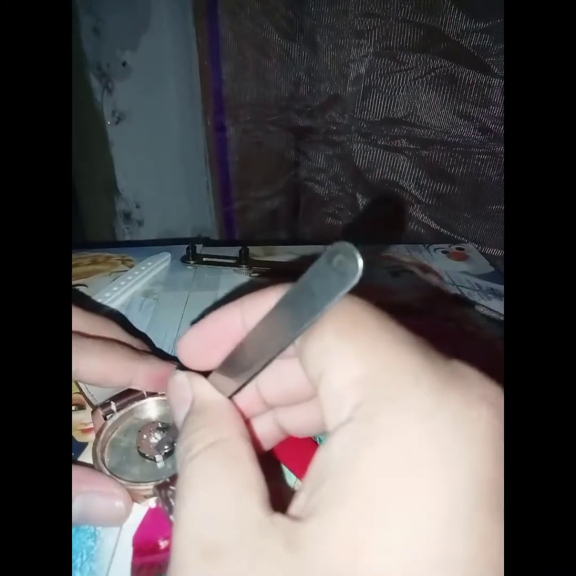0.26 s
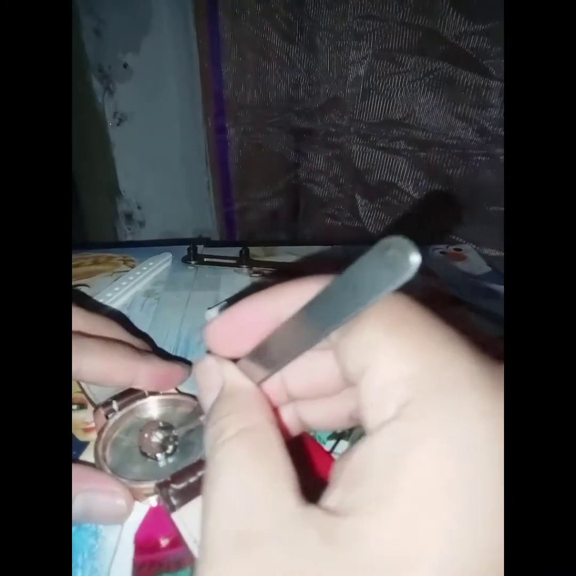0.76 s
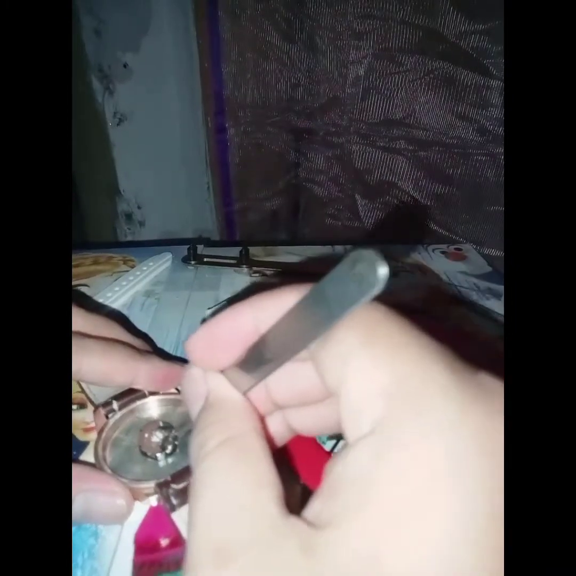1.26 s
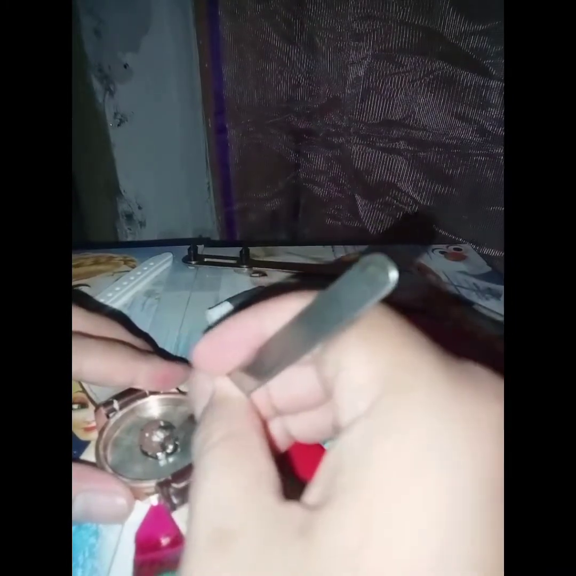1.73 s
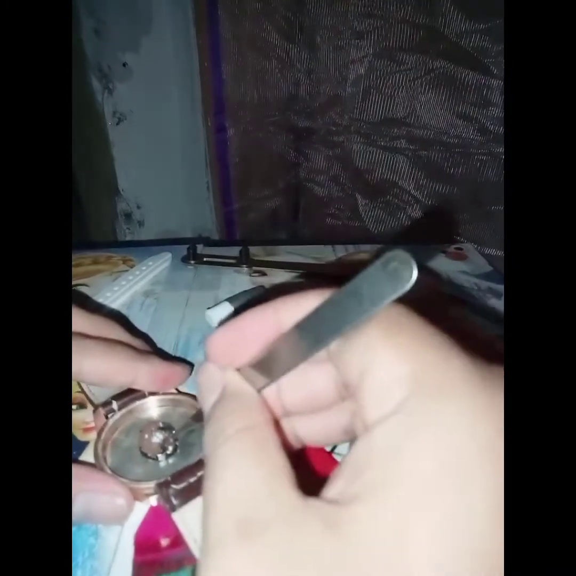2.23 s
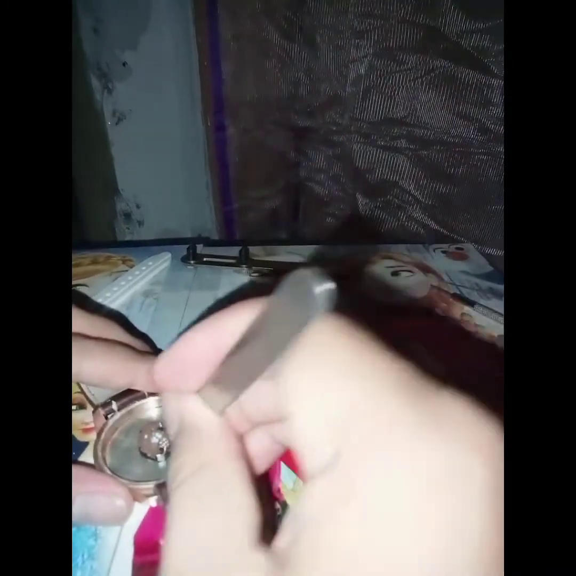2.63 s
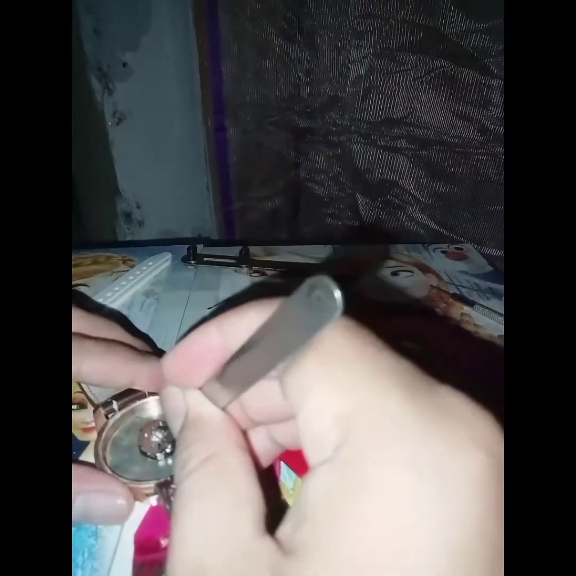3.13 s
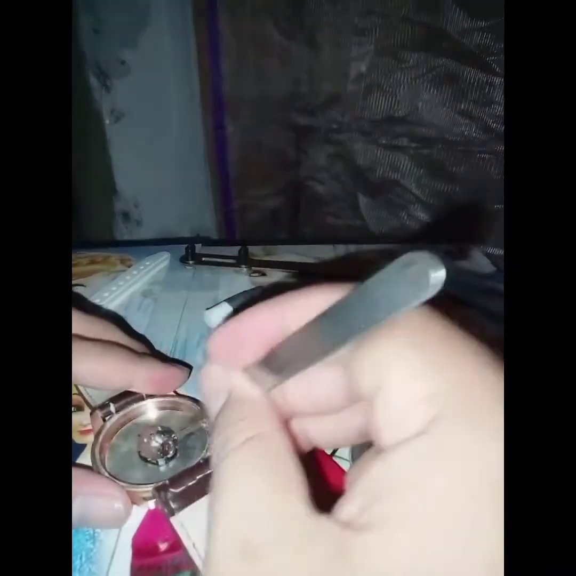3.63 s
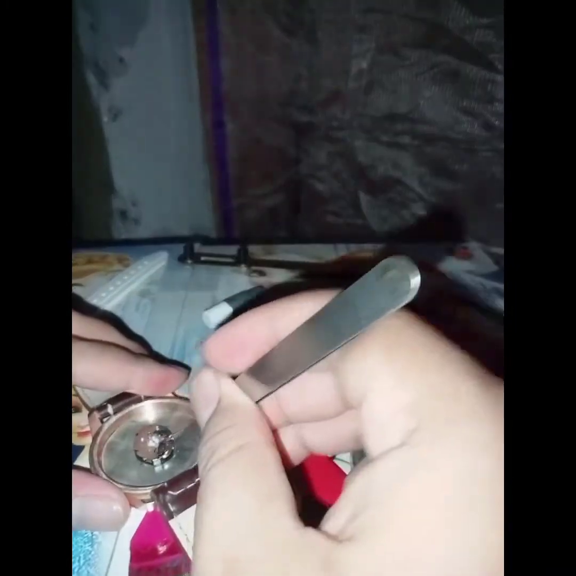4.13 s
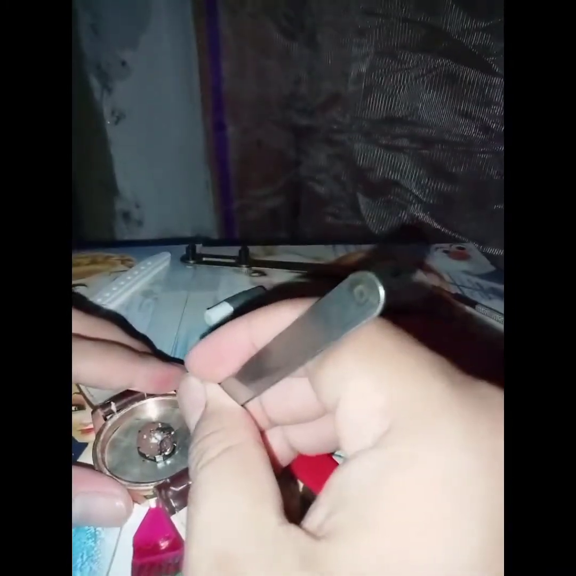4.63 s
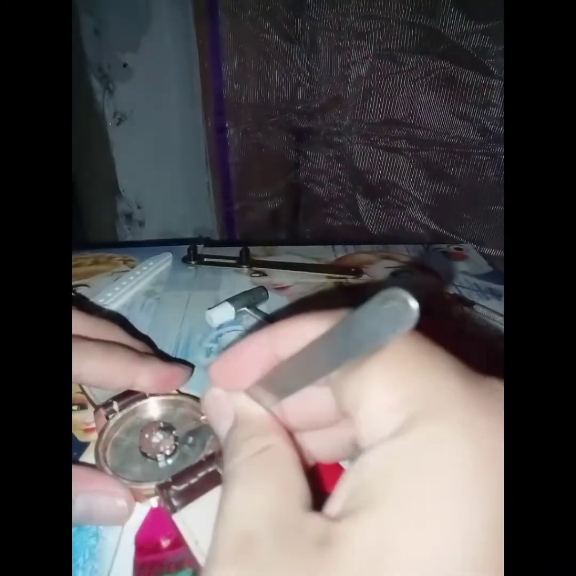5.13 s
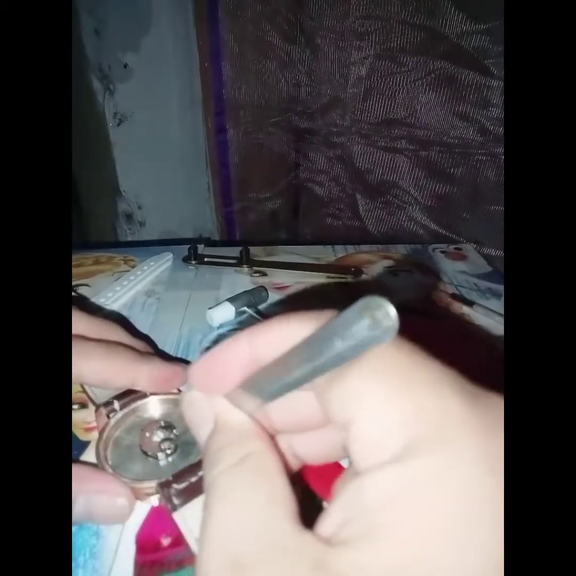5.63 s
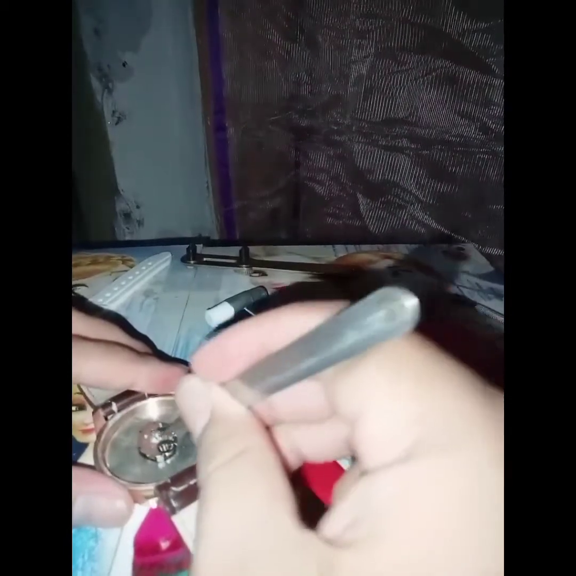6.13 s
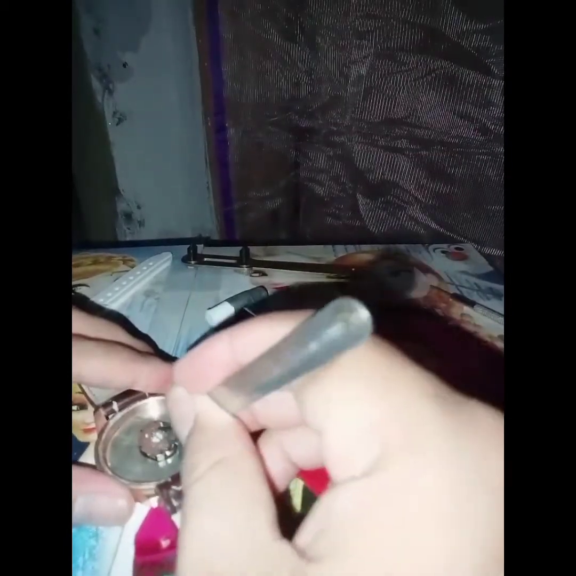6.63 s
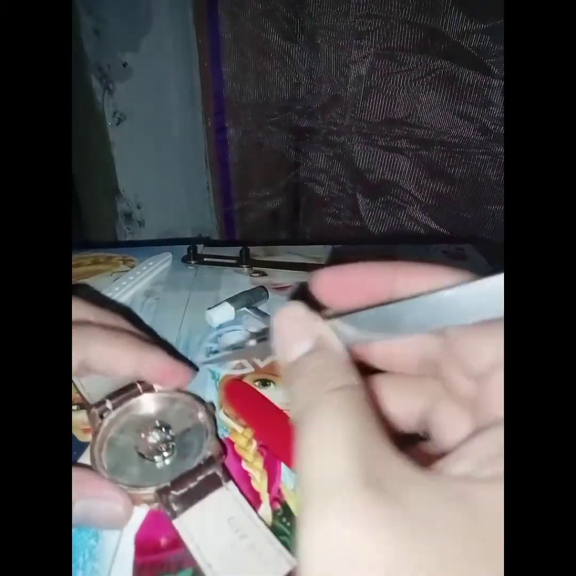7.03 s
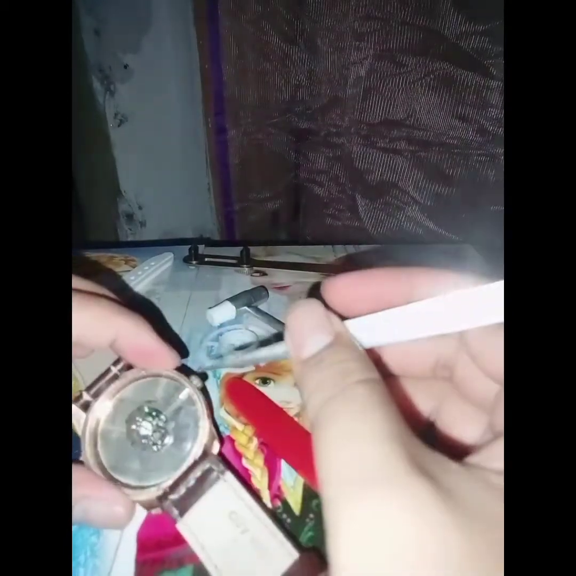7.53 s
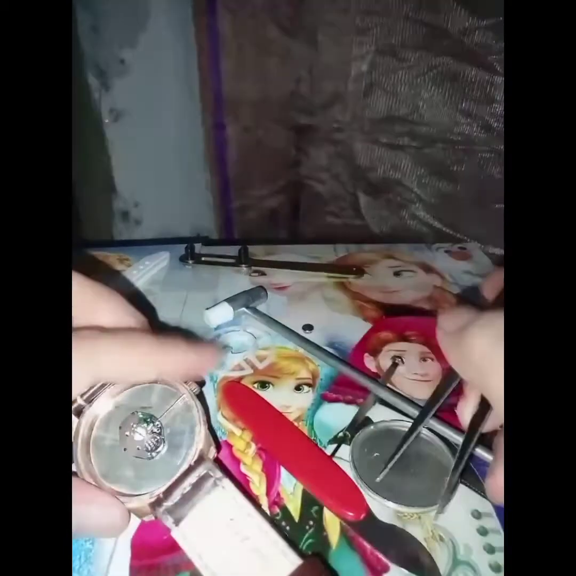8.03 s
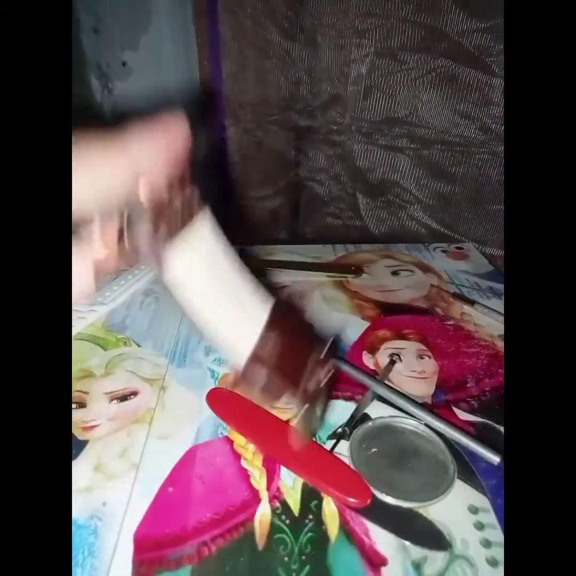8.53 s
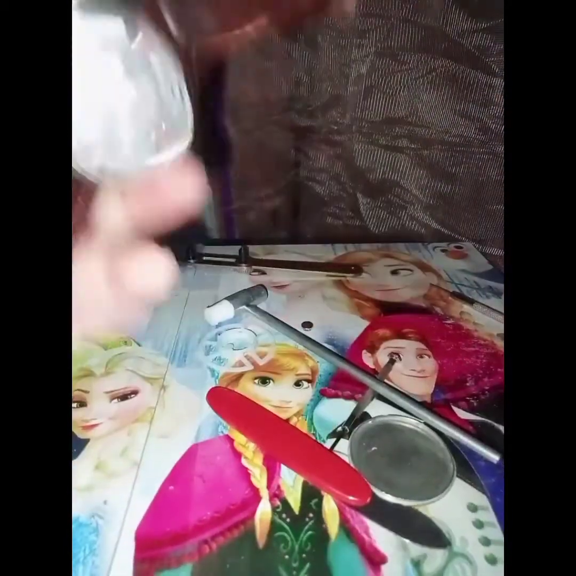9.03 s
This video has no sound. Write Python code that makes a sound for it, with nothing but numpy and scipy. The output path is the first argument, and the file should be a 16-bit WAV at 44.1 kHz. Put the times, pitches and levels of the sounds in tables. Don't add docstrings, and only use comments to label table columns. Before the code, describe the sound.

Small tweezers slip and snap on a metal battery rim, heard very near through a phone microphone. Tiny ticks, skidding clatters and brighter snaps alternate with near silence over a soft room hum. The strongest double crack comes about halfway. Towards the end handling turns softer, then the watch knocks and drags off the table with a clicking buckle, a low thud and a swish, leaving quiet room noise.

```python
import sys
import numpy as np
from scipy import signal
from scipy.fft import rfft, irfft
from scipy.io import wavfile

SR = 44100
rng = np.random.default_rng(int(sys.argv[2]) if len(sys.argv) > 2 else 0)


def rack_gain(trim_db):
    fader = np.asarray(trim_db, float)
    return 10 ** (fader / 20)


def generate_wav(sig):
    pcm = np.round(np.clip(np.atleast_2d(sig).T, -1, 1) * 32767).astype(np.int16)
    wavfile.write(sys.argv[1], SR, pcm)


N = 408347
CLOCK_S = np.arange(N) / SR


def rms_one(x):
    return x / np.sqrt(np.mean(x ** 2) + 1e-20)


def peak_one(x):
    return x / np.max(np.abs(x))


def coloured(spectrum, size):
    hz, db = np.transpose(spectrum)
    bins_hz = np.arange(1, size // 2 + 2) * SR / size
    gain = rack_gain(np.interp(np.log(bins_hz), np.log(hz), db))
    return rms_one(irfft(rfft(rng.standard_normal(size)) * gain, size))


def drift(rate_hz, size=N):
    r = np.exp(-2 * np.pi * rate_hz / SR)
    settle = SR // 4
    slow = signal.lfilter([1], [1, -2 * r, r * r], rng.standard_normal(size + settle))
    return rms_one(slow[settle:])


def resonate(x, modes, gains_db=None):
    if gains_db is None:
        gains_db = np.zeros(len(modes))
    out = 0
    for k, (hz, width, db) in enumerate(modes):
        r = np.exp(-np.pi * width / SR)
        top = (-1) ** k * rack_gain(db + gains_db[k]) * (1 - r * r) / 2
        out = out + signal.lfilter([top, 0, -top], [1, -2 * r * np.cos(2 * np.pi * hz / SR), r * r], x)
    return out


# f/Hz, level/dB (per Hz)
AIR_COLOUR = [(45, -30), (100, -8), (200, -5), (520, -15), (870, -5.5), (1200, -13), (1450, -11.5),
              (1900, -17), (4500, -22), (5700, -37.5), (7100, -27), (8000, -28), (8700, -40),
              (15500, -41.5)]
# f/Hz, bandwidth/Hz, level/dB
DRONE_MODES = [(98, 23, -4), (290.4, 37, 0), (7130, 200, -22.5)]
# t/s, level/dB
STILL_LEVEL = [(0.0, -57.5), (2.45, -55.5), (3.22, -56), (3.48, -53), (4.07, -52), (4.3, -54.5),
               (5.13, -56.5), (5.44, -60.5), (6.009, -59), (6.598, -59), (6.941, -58.5), (7.53, -59.5),
               (8.33, -56), (9.26, -52)]
LEAK_DB, LEAK_HZ, LEAK_TOP_DB = -6.5, 12, -44


def still_room(handling, patchy_db=1.5, drone_db=-0.5):
    drone = rms_one(resonate(rng.standard_normal(N), DRONE_MODES))
    air = coloured(AIR_COLOUR, size=N + N % 2)[:N] + rack_gain(drone_db) * drone
    r = np.exp(-2 * np.pi * LEAK_HZ / SR)
    leak_power = rack_gain(2 * LEAK_DB) * signal.lfilter([1 - r], [1, -r], handling ** 2)
    quiet = rack_gain(np.interp(CLOCK_S, *np.transpose(STILL_LEVEL)))
    level = np.sqrt(quiet ** 2 + np.minimum(leak_power, rack_gain(2 * LEAK_TOP_DB)))
    return level * rack_gain(patchy_db * drift(6.9)) * rms_one(air)


# t/s, peak level/dB, brightness level/dB, f/Hz
SKIDS = [(0.498, -25.5, -17, 3500), (0.504, -35, -8, 6500), (0.51, -22.5, -13.5, 2880),
         (0.528, -31, -9, 1100), (0.56, -30.5, -12, 6400), (1.152, -40.5, -12, 810),
         (1.536, -33.5, -9, 800), (2.023, -43.5, -15, 2650), (2.817, -25, -7.5, 6500),
         (3.151, -45, -13, 7000), (3.156, -33, -24, 3500), (3.17, -41, -29, 1310), (3.567, -27, -24, 3000),
         (3.932, -32.5, -7, 3500), (3.95, -30.5, -23, 2540), (4.02, -39.5, -25, 3700), ]
# t/s, peak level/dB, brightness level/dB, f/Hz
TOUCHES = [(1.097, -49, -8, 754), (1.125, -35.5, -10, 830), (1.56, -41, -37, 791), (2.782, -51, -10, 6600),
           (2.799, -44, -9, 7000), (2.807, -42, -4, 6600), (2.853, -35.5, -20, 790), (4.04, -41, -17, 6400),
           (4.054, -37, -15, 6400), (4.185, -44.5, -4, 2700), (4.211, -48, -14, 4630),
           (4.51, -43, -11, 4800), (4.919, -47, -19, 912), (5.981, -44, -25.5, 1356),
           (5.994, -47, -10, 1013), (6.426, -57, -6, 6350), (6.623, -39.5, -8.5, 980),
           (7.256, -51.5, 3.5, 888), (7.833, -46, -5, 4430), (8.08, -54.5, 0.5, 735),
           (8.189, -42.5, -27, 1880), (8.25, -32.5, -34, 1550), (8.287, -46, -27, 1440),
           (8.637, -31, -7, 6600), (8.831, -32.5, -32, 2300), (8.909, -45, -40, 2400)]
# t/s, peak level/dB, brightness level/dB, f/Hz, room send level/dB
SNAPS = [(1.852, -11.5, -28, 1235, 6), (2.641, -21.5, -14, 2670, 3), (2.645, -16.5, -16, 7900, 10.5),
         (2.661, -22.5, -14, 1830, -15), (2.686, -21.5, -2.5, 2730, -12), (2.692, -18.5, -15, 820, 5),
         (2.733, -23.5, -9, 6270, 10.5), (3.343, -21, -14, 1120, 13), (3.349, -14.5, -14, 4670, 4),
         (5.151, 3.5, -13, 4750, 3.5), (5.185, 2.5, -5, 1130, -1.5), (5.749, -25, -22, 2700, 13.5),
         (5.781, -33.5, -17, 2730, 0), (6.348, -30, -17, 6400, 15), (6.748, -33, -11, 880, 7.5),
         (6.982, -35.5, -25, 3220, 18)]
# t/s, peak level/dB, brightness level/dB, f/Hz, thump level/dB
BUMPS = [
    (8.434, -28, 9, 7340, -18.5),
    (8.449, -42, 19, 888, -17),
    (8.491, -18.5, 4, 8800, -29),
    (8.496, -20, -39, 990, -22),
    (8.507, -46, -14, 896, 3.5),
    (8.537, -29, -41, 840, -0.5),
    (8.547, -44, -35, 850, -9),
    (8.56, -31, -39, 2090, -15),
]
SNAP_THUMP_DB, SKID_THUMP_DB, TOUCH_THUMP_DB = -16, -59, -21
SKID_SEND_DB, TOUCH_SEND_DB, BUMP_SEND_DB = 14.5, 4, -1


def contacts():
    skids = [(s, db, SKID_THUMP_DB, bright, hz, SKID_SEND_DB) for s, db, bright, hz in SKIDS]
    touches = [(s, db, TOUCH_THUMP_DB, bright, hz, TOUCH_SEND_DB) for s, db, bright, hz in TOUCHES]
    snaps = [(s, db, SNAP_THUMP_DB, bright, hz, send) for s, db, bright, hz, send in SNAPS]
    bumps = [(s, db, thump, bright, hz, BUMP_SEND_DB) for s, db, bright, hz, thump in BUMPS]
    return skids + touches + snaps + bumps


# f/Hz, bandwidth/Hz, level/dB
TABLE_MODES = [(346, 210, 0)]
CASE_MODES = [(810, 110, 0), (1120, 230, 5), (1313, 450, -0.5), (1760, 340, 0), (2790, 280, 3),
              (3780, 320, 0), (4615, 110, -2.5), (6457, 300, -0.5), (7410, 330, -1.5), (8176, 270, -4.5)]
TIP_MODES = [(10410, 610, -3), (11700, 500, -23), (12850, 1500, -16.5), (14800, 1100, 7.5)]
ARM_MODES = [(1640, 45, -6), (2870, 120, -1), (3500, 58, 0.5), (6500, 38, -6), (15460, 210, -4.5)]
CHATTER_MS, GRIP_RISE_S = 4.5, 0.00044
TILT_DB = 0.2
FOCUS_DB, FOCUS_OCTAVES = 7.5, .35
ARM_RING_DB = -18


def taps(scatter_db=-1.0, size=2600):
    direct, send = np.zeros(N + size), np.zeros((3, N))
    t = np.arange(size) / SR
    grip = (1 - np.exp(-t / GRIP_RISE_S)) * np.exp(-(1000 * t / CHATTER_MS) ** 1.4)
    thump = peak_one(resonate(np.gradient(grip), TABLE_MODES))
    case_hz = np.array(CASE_MODES)[:, 0]
    for s, peak_db, thump_db, bright_db, focus_hz, send_db in contacts():
        chatter = rng.standard_normal(size) * grip
        luck = rng.standard_normal(len(CASE_MODES))
        near = np.exp(-(np.log2(case_hz / focus_hz) / FOCUS_OCTAVES) ** 2)
        tilt_db = TILT_DB * (bright_db + 14.5) * np.log2(case_hz / 2500)
        case_db = FOCUS_DB * near + tilt_db + scatter_db * luck
        case = peak_one(resonate(chatter, CASE_MODES, case_db) + 0.1 * chatter)
        arms = peak_one(resonate(chatter, ARM_MODES, 2 * scatter_db * luck))
        arms_db = ARM_RING_DB + 0.25 * (SNAP_THUMP_DB - thump_db)
        tips = peak_one(resonate(chatter, TIP_MODES) + 0.064 * np.gradient(chatter))
        sound = case + rack_gain(arms_db) * arms + rack_gain(bright_db + 3) * tips + rack_gain(thump_db + 5.5) * thump
        at = round(s * SR) - 30
        direct[at:at + size] += rack_gain(peak_db) * sound
        balance_db = np.array([1.8 * (thump_db + 10.5), 0, 1.8 * (bright_db + 7.5)])
        send[:, at] += rack_gain(peak_db + send_db + balance_db)
    return direct[:N], send


# f/Hz, level/dB (per Hz)
ROOM_COLOUR = [(60, -14.5), (200, 5), (390, 5.5), (600, -12.5), (1150, -5), (1500, -9), (2100, -20.5),
               (2700, -12), (4500, -16.5), (5600, -26.5), (7300, -16), (9500, -31.5), (13000, -26.5),
               (15200, -16)]
# f/Hz, bandwidth/Hz, level/dB
TABLE_BOOM = [(365, 13, 2.5), (384, 26, 5.5)]
ROOM_T60_S = [.85, .66, .52]
ROOM_BANDS_HZ = [20, 650, 8800, 17000]
ROOM_DB = -25.5
GATE_DB, GATE_HZ, GATE_SLOPE = -37, 26, 1.4


def room(send):
    t, tail = np.arange(SR) / SR, 0
    noise = coloured(ROOM_COLOUR, size=SR) * (1 - np.exp(-t / 0.0006))
    noise = noise + resonate(noise, TABLE_BOOM)
    for push, t60, low, high in zip(send, ROOM_T60_S, ROOM_BANDS_HZ, ROOM_BANDS_HZ[1:]):
        band = signal.butter(2, [low, high], "band", fs=SR, output="sos")
        answer = signal.sosfilt(band, noise) * rack_gain(-60 * t / t60)
        tail = -tail + rack_gain(ROOM_DB) * signal.fftconvolve(push, answer)[:N]
    r = np.exp(-2 * np.pi * GATE_HZ / SR)
    level_db = 10 * np.log10(signal.lfilter([1 - r], [1, -r], tail ** 2) + 1e-14)
    return tail * rack_gain(-GATE_SLOPE * np.clip(GATE_DB - level_db, 0, 30))


# strongest t/s, rise t/s, fall t/s, hiss level/dB, rumble level/dB
RUBS = [(3.42, .05, 0.32, -63, -69), (3.575, 0.038, 0.044, -51, -48), (4.026, 0.14, 0.073, -58, -55),
        (5.712, .006, .05, -70.5, -74), (6.33, .02, .02, -67.5, -77.5), (7.158, .2, 0.5, -68, -72),
        (7.852, 0.14, 0.18, -68, -71), (8.36, .1, .07, -64, -58), (8.452, .018, 0.041, -32, -35),
        (8.504, 0.018, 0.042, -42, -26), (8.554, 0.047, 0.032, -64, -30.5), (8.66, 0.08, .08, -73, -50),
        (8.769, 0.19, 0.079, -49, -53), (8.84, 0.056, .04, -60, -52), (9.164, 0.84, 0.13, -76, -69)]
# f/Hz, level/dB (per Hz)
RUB_COLOUR = [(880, -3), (1500, 3), (1810, -13.5), (2500, 8), (3220, 1), (3660, 4), (5470, -7), (7340, 7.5),
              (8580, -4), (11100, -12), (15600, -1.5)]
# f/Hz, bandwidth/Hz, level/dB
RUMBLE_MODES = [(338.5, 210, 1), (936, 50, 4.5), (1510, 370, -9)]
STROKE_EDGE_DB = -13


def rubbing():
    grains = rack_gain(2.8 * drift(150))
    hiss = rms_one(grains * coloured(RUB_COLOUR, size=N + N % 2)[:N])
    shaking = grains * rack_gain(3 * drift(40)) * rng.standard_normal(N)
    rumble = rms_one(resonate(shaking, RUMBLE_MODES))
    out = 0
    for top, rise, fall, hiss_db, rumble_db in RUBS:
        times_s, levels_db = [top - rise, top, top + fall], [STROKE_EDGE_DB, 0, STROKE_EDGE_DB]
        stroke_db = np.interp(CLOCK_S, times_s, levels_db, -130, -130)
        out = out + rack_gain(stroke_db) * (rack_gain(hiss_db) * hiss + rack_gain(rumble_db) * rumble)
    return out


# start t/s, length t/s, slip rate at full speed f/Hz, level/dB
SQUEAKS = [
    (7.88, .51, 2250, -81),
    (8.075, .235, 1825, -73),
    (5.7, .05, 3950, -73),
    (6.305, .05, 6200, -73),
]
# multiple of the slip rate, level/dB
SQUEAK_LINES = [
    [(3, -0.5), (3.4, -9), (3.95, -3), (4.4, -7.5), (6.05, -2)],
    [(3.13, -11), (4.15, 2), (5.03, -8.5), (5.95, -15), (7, -2.5), (7.7, -11)],
    [(1, 0), (1.75, -3)],
    [(1, 0)],
]
SQUEAK_SAG, SQUEAK_EDGE_DB, SQUEAK_PUSH = .13, -14, 1.25


def squeaks():
    out = np.zeros(N)
    for (start, length, top_hz, level_db), lines in zip(SQUEAKS, SQUEAK_LINES):
        at, size = round(start * SR), round(length * SR)
        speed = np.minimum(SQUEAK_PUSH * np.sin(np.pi * np.arange(size) / size), 1)
        slip_hz = top_hz * (1 - SQUEAK_SAG * (1 - speed))
        for multiple, line_db in lines:
            waver = .005 * drift(150, size)
            flicker_db = 5.5 * drift(25, size)
            db = level_db + line_db + flicker_db + SQUEAK_EDGE_DB * (1 - speed) ** 2
            phase = 2 * np.pi * multiple * np.cumsum(slip_hz * (1 + waver)) / SR
            out[at:at + size] += rack_gain(db) * np.sin(phase)
    return out


WALL_ECHO_S, WALL_ECHO_DB = .0195, -19.5
BASS_CUT_HZ, MIC_HISS_DB = 130, -80.5


def scene():
    direct, send = taps()
    lag = round(WALL_ECHO_S * SR)
    echo = rack_gain(WALL_ECHO_DB) * np.pad(direct, (lag, 0))[:N]
    wash = room(send) + rubbing()
    bass_cut = signal.butter(2, BASS_CUT_HZ, "high", fs=SR, output="sos")
    handling = signal.sosfilt(bass_cut, direct + echo + wash + squeaks())
    hiss = rack_gain(MIC_HISS_DB) * rng.standard_normal(N)
    return (handling + still_room(wash) + hiss)[None]


def roll_off(x):
    return signal.sosfilt(signal.butter(12, 16620, fs=SR, output="sos"), x)


def record(dry):
    ceiling = .72
    rounded = ceiling * np.tanh(dry / ceiling)
    treble_cut = signal.cheby2(16, 30, 15650, fs=SR, output="sos")
    return roll_off(signal.sosfiltfilt(treble_cut, rounded))


dry = scene()
out = record(dry)
generate_wav(out)
```